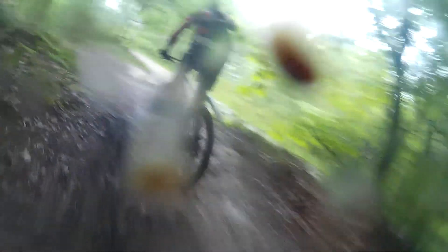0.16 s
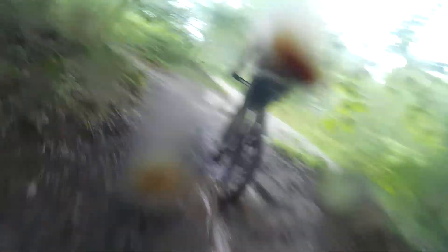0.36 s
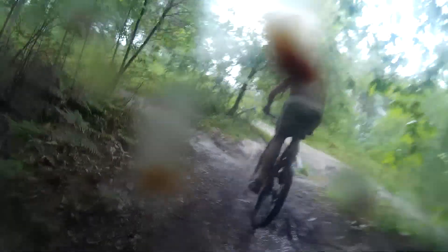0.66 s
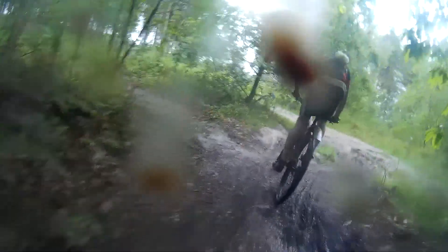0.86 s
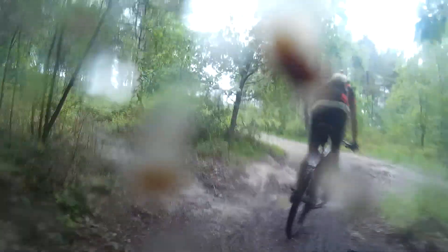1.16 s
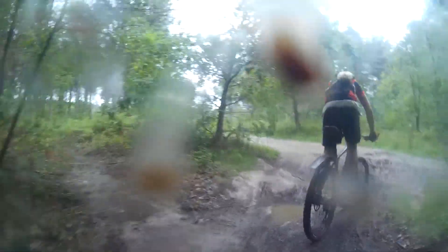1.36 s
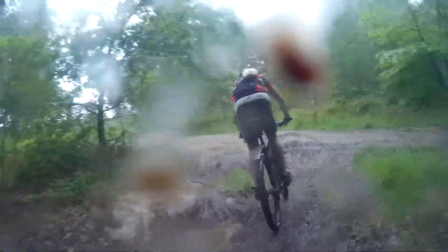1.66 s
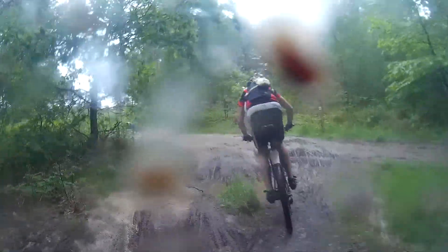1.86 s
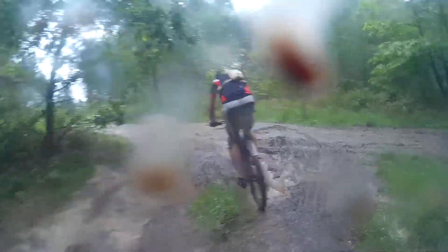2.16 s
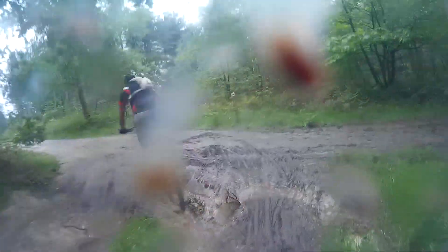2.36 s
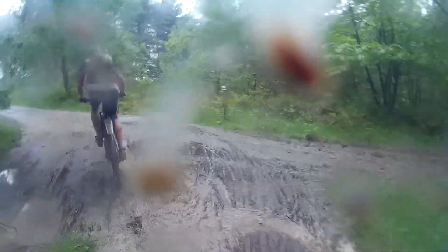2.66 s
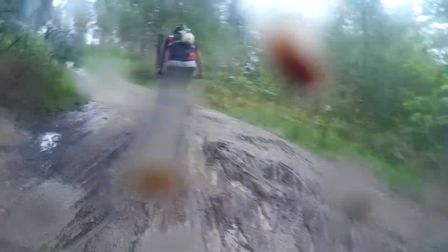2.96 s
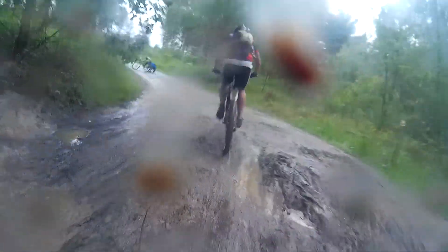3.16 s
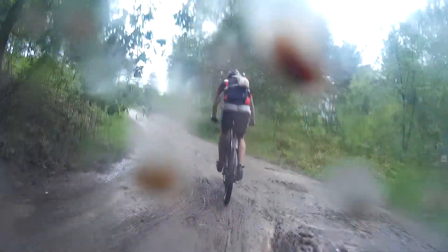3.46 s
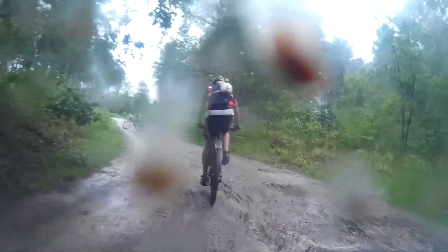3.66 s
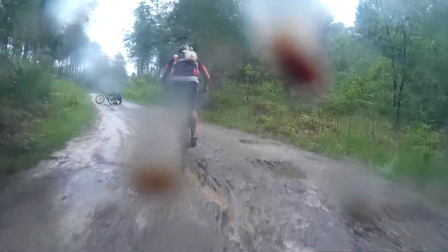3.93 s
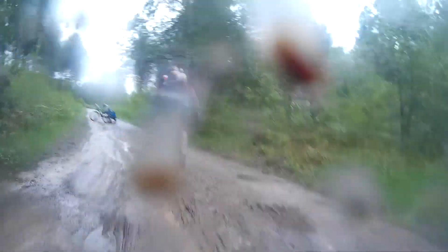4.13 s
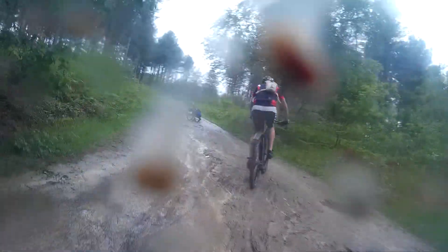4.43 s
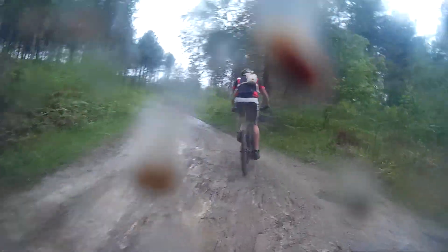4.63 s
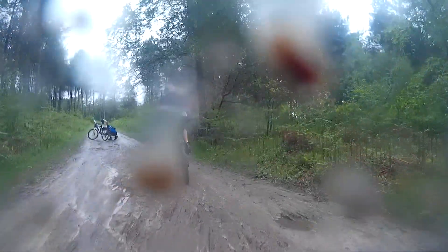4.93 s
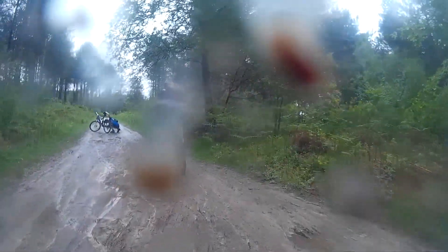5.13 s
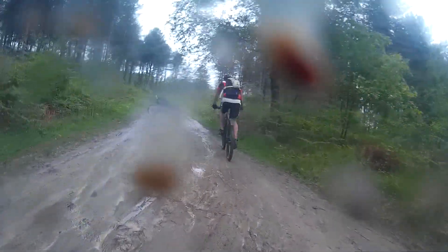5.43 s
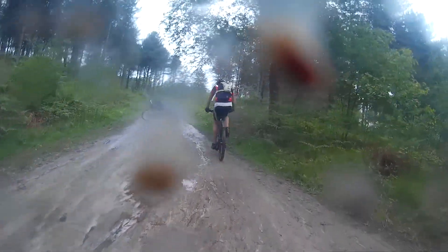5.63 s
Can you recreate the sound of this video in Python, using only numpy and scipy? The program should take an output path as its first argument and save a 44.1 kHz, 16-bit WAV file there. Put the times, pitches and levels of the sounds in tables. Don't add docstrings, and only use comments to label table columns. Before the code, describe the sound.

Close, boxy and muffled sound of a bike on a wet forest trail. Low buffeting and throbbing from the shaking mount, hollow frame rumble and gritty spatter run on, with irregular clacks and thuds. Knocks crowd together just before and at four seconds; after about four and a half the lows sink, leaving patter, faint hiss and a last cluster of hollow chain slaps.

```python
import sys
import numpy as np
from scipy import signal
from scipy.fft import rfft, irfft
from scipy.io import wavfile
from scipy.ndimage import uniform_filter1d, map_coordinates

SR = 44100
rng = np.random.default_rng(int(sys.argv[2]) if len(sys.argv) > 2 else 0)


def voltage_ratio(decibels):
    exponent = np.asarray(decibels, float) / 20
    return 10 ** exponent


def unload_audio(sound):
    columns = np.transpose(np.atleast_2d(sound))
    steps = np.round(np.clip(columns, -1, 1) * 32767)
    wavfile.write(sys.argv[1], SR, steps.astype(np.int16))


N = 255308

# pitch in Hz, level in dB per Hz.
HISS_COLOR = [(3500, -60), (4800, 0), (5500, -2.5), (7500, -2), (9000, -3), (14300, -3.5), (15600, -10),
              (15750, -91)]
HISS_DB = -72
# pitch in Hz, level in dB.
WHINES = [(6320, -94), (9485, -90), (9555, -88)]

# time in seconds, mud thrown in dB, wetness in dB, shaking in dB.
TRAIL = [(0.0, -45, -12, 3.5), (0.11, -54, -9.5, -0.5), (0.42, -37, -18, 5), (0.6, -49, -18.5, -4.5),
         (0.8, -43.5, -16, 4), (1.13, -41.5, -19, 2.5), (1.32, -48, -20.5, -3), (1.51, -42.5, -14, 0.5),
         (1.88, -42, -14, -1), (2.3, -42, -18.5, -0.5), (2.93, -43, -9, -2), (3.2, -47, -15.5, 0.5),
         (3.8, -41.5, -19, 1), (4.3, -46, -16, -2.5), (4.62, -53, -15, -7), (4.78, -43, -17.5, 2.5),
         (5.0, -40, -19.5, 1.5), (5.79, -46, -16, 0.5)]
WIND_DB, WIND_FOLLOWS, FRAME_DB, FRAME_FOLLOWS = -39, 1.1, -45.5, 1
COAST_S, COAST_DB, COAST_EASE_S = 4.446, -8, 0.074

# pitch in Hz, level in dB per Hz.
RUMBLE_COLOR = [(50, -22.5), (85, 1), (140, -6), (221, -1), (258, -13.5), (320, -14.5), (420, -26),
                (700, -120)]
FRAME_COLOR = [(160, -31), (280, -8.5), (339, -7), (404, 3), (452, 2), (523, -8), (594, -13.5), (681, -7),
               (820, -14), (870, -12), (900, -27), (1170, -85.5), (1980, -120)]
SHELL_COLOR = [(510, -25), (860, -7.5), (1000, 1), (1200, -3), (1420, 3), (1640, 1), (1760, 0),
               (1940, -18.5), (2000, -19.5), (2600, -55.5), (4400, -120)]
LID_COLOR = [(1140, -34), (1930, -4.5), (2130, 5), (2520, -3.5), (2630, 1), (2810, 0), (2970, -3),
             (3150, -15), (4100, -47), (6930, -120)]
LATCH_COLOR = [(1140, -49), (1930, -17), (2000, -4), (2360, -0.5), (2680, -1.5), (2910, -7.5),
               (3150, -18.5), (3860, -10.5), (4730, -32.5), (5000, -36.5), (6500, -64), (11000, -120)]
WINDOW_COLOR = [(1850, -46.5), (3150, -16), (3680, 0), (3830, -0.5), (4440, -12.5), (4730, -23.5),
                (5000, -29.5), (6500, -53), (11000, -120)]
LEAK_COLOR = [(1000, -97.5), (3500, -24), (5000, 1.5), (7000, -2.5), (9000, -17.5), (14000, -16.5),
              (15700, -46.5)]

# start in seconds, length in seconds, shell level in dB, window level in dB, treble level in dB.
SCUFFS = [(0.0, 0.25, -50.5, -61, -84), (2.434, 0.067, -43.5, -56, -86.5), (2.89, 0.1, -50, -54, -86),
          (2.65, 0.07, -44, -62, -88), (4.87, 0.12, -44, -64, -88), (0.225, 0.03, -48, -58, -86),
          (0.39, 0.03, -50, -58, -86), (3.191, 0.015, -29, -40.5, -63), (3.424, 0.12, -45, -59, -82),
          (5.142, 0.0092, -46, -44.5, -85), (3.795, 0.049, -41, -51.5, -72),
          (4.007, 0.034, -35.5, -44.5, -58), (4.038, 0.018, -31, -47, -75), (4.173, 0.057, -48, -55.5, -71)]
# start in seconds, pitch in Hz, level in dB, fade by 60 dB in seconds.
PINGS = [(0.0, 289, -23.5, 0.32), (1.91, 708, -28, 0.055), (1.97, 495, -26, 0.089), (2.31, 2110, -43, 0.27),
         (4.36, 2920, -56.5, 0.16), (4.84, 2900, -52, 0.23), (5.155, 2880, -45.5, 0.18),
         (5.22, 2900, -49.5, 0.11), (4.53, 448, -32, 0.11), (4.565, 1636, -26.5, 0.096),
         (4.566, 2860, -47, 0.096), (4.72, 1707, -32, 0.21), (4.72, 2097, -44, 0.13),
         (4.791, 404, -21, 0.12), (3.196, 1060, -28.5, 0.033), (4.83, 683, -32, 0.094),
         (5.0, 810, -33.5, 0.097), (5.08, 824, -23.5, 0.035), (5.34, 1737, -31, 0.09),
         (5.597, 434, -28.5, 0.37)]
# start in seconds, peak in dB.
CRACKS = [
    (3.194, -56),
    (3.936, -52),
    (4.011, -44),
    (4.038, -36),
    (4.045, -48),
    (4.331, -62),
]
# start in seconds, peak in dB, pitch in Hz.
SHELL_SNAPS = [(0.152, -22, 1340), (0.419, -30, 1450), (0.45, -26, 1550), (0.489, -30, 1420),
               (0.504, -27, 1470), (0.802, -30, 1490), (0.83, -17, 1590), (0.868, -25, 958),
               (1.016, -28, 1700), (1.038, -32, 1090), (1.049, -29, 1120), (1.078, -27, 1060),
               (1.253, -30, 1500), (1.271, -27, 980), (1.354, -34, 1530), (1.495, -29, 1050),
               (1.909, -28, 1580), (1.957, -31, 1460), (1.994, -28, 1440), (2.142, -28, 1410),
               (2.31, -29, 1410), (2.328, -27, 1380), (2.444, -27, 1750), (3.054, -27, 1410),
               (3.111, -26, 991), (3.195, -18, 1430), (3.365, -30, 1400), (3.399, -34, 1290),
               (3.63, -32, 1330), (3.642, -26, 1550), (3.687, -29, 1430), (3.722, -22, 993),
               (3.752, -23, 851), (3.752, -14, 1650), (3.77, -18, 1650), (3.807, -24, 1500),
               (3.968, -31, 1030), (4.013, -23, 1440), (4.043, -21, 1510), (4.235, -33, 1460),
               (4.33, -32, 1420), (4.391, -34, 1510), (4.565, -27, 1640), (4.716, -31, 1700),
               (4.777, -29, 1520), (4.792, -24, 999), (4.821, -29, 1050), (5.004, -25, 1360),
               (5.082, -27, 980), (5.149, -29, 1670), (5.154, -26, 1340), (5.339, -29, 1290),
               (5.413, -30, 1430), (5.428, -28, 1020), (5.48, -32, 1430), (5.523, -14, 1680),
               (5.564, -18, 1010), (5.593, -14, 1100), (5.637, -23, 1080), (5.683, -36, 1390)]
# start in seconds, peak in dB, pitch in Hz.
GRIT_SPITS = [(0.1516, -40, 3830), (0.2239, -43, 2710), (0.2389, -43, 2120), (0.3985, -39, 2770),
              (0.7672, -44, 3680), (0.828, -32, 2630), (0.8934, -45, 2110), (0.9038, -42, 2070),
              (1.072, -43, 2240), (1.2705, -36, 2660), (1.8462, -39, 3790), (2.1365, -45, 2360),
              (2.1934, -40, 2310), (2.3096, -41, 2100), (2.9527, -36, 2710), (3.1941, -32, 3680),
              (3.3643, -44, 2240), (3.6401, -37, 2320), (3.7199, -39, 2630), (3.7499, -31, 2440),
              (3.7713, -33, 2330), (3.8038, -30, 2290), (3.8726, -46, 2590), (4.0108, -36, 3870),
              (4.0427, -30, 2130), (4.1884, -43, 3820), (4.5665, -41, 2880), (4.7177, -45, 2100),
              (4.7895, -32, 2390), (4.9023, -43, 2260), (4.9995, -41, 2210), (5.0399, -43, 2170),
              (5.1437, -29, 2700), (5.4246, -41, 2350), (5.5223, -33, 2610), (5.5623, -37, 2390),
              (5.5902, -28, 2350), (5.6211, -41, 2090), (5.6336, -39, 2110), (5.6845, -46, 2640)]
# start in seconds, peak in dB, pitch in Hz.
TUBE_JOLTS = [(0.579, -30, 125), (0.742, -27, 190), (0.77, -27, 150), (0.81, -26, 170), (0.86, -23, 135),
              (0.885, -24, 150), (0.938, -26, 130), (1.008, -27, 175), (1.045, -27, 487), (1.1, -22, 430),
              (1.118, -24, 215), (1.384, -33, 188), (1.494, -23, 218), (1.53, -27, 190), (1.678, -30, 223),
              (1.757, -29, 125), (1.888, -30, 484), (1.912, -29, 377), (2.797, -29, 200), (2.92, -27, 110),
              (3.13, -26, 130), (3.178, -21, 105), (3.188, -25, 410), (3.206, -19, 160), (3.303, -24, 430),
              (3.465, -25, 120), (3.57, -27, 430), (3.716, -30, 191), (3.905, -28, 480), (4.01, -27, 460),
              (4.234, -29, 125), (4.329, -32, 215), (4.383, -33, 220), (4.43, -34, 140), (4.52, -35, 150),
              (4.6, -35, 190), (4.9, -33, 330), (4.959, -34, 180), (5.421, -35, 90)]

# start in seconds, peak in dB, bright part in dB, dull part in dB.
CHAIN_SLAPS = [(0.151, -20, -22, -15), (0.451, -25.5, -21.5, 1), (0.504, -21.5, -21, -23),
               (0.829, -11.5, -21, -6.5), (0.868, -23, -22, -20), (1.077, -25, -20.5, 5),
               (1.271, -20.5, -17, -1), (1.911, -29.5, -27, 9.5), (1.995, -26, -19.5, 4),
               (2.328, -23.5, -25, -17), (2.444, -22, -21, -8), (3.056, -22, -20, -7.5),
               (3.111, -23.5, -21, 7), (3.194, -12, -30, -7.5), (3.365, -23, -23.5, -6),
               (3.641, -19.5, -19.5, -18), (3.721, -19.5, -22, -15), (3.75, -11.5, -22.5, -21),
               (3.77, -12, -23, -7.5), (3.806, -20, -16, -16), (4.042, -19, -12, -4), (4.052, -24, -13, -8),
               (4.563, -24.5, -15.5, -25), (4.789, -21.5, -12.5, 10), (4.82, -24, -30, 8.5),
               (5.001, -22, -21, -8), (5.145, -20.5, -13, 0), (5.523, -9.5, -22, -14),
               (5.564, -19, -17, -6), (5.591, -11.5, -17, -22), (5.636, -21, -20, 4.5)]
# start in seconds, peak in dB.
MORE_SLAPS = [(0.265, -31), (0.419, -23), (0.489, -24.5), (0.753, -32), (0.803, -29), (1.015, -27),
              (1.036, -33), (1.354, -30), (1.411, -31), (1.495, -26.5), (1.547, -26.5), (2.141, -35),
              (2.205, -21.5), (2.308, -24.5), (2.425, -28.5), (2.693, -27.5), (3.042, -27), (3.666, -30),
              (3.685, -25), (4.013, -24), (4.185, -26), (4.234, -30), (4.33, -27.5), (4.389, -30),
              (4.716, -27.5), (4.777, -25), (5.082, -32), (5.413, -33), (5.429, -23.5), (5.752, -31)]
TICK_BRIGHT_DB, TICK_DULL_DB = -21, -8
# start in seconds, peak in dB.
BUMPS = [(0.355, -25.5), (0.53, -17.5), (0.743, -33), (0.787, -24), (1.102, -13), (1.498, -22.5),
         (1.814, -27), (1.963, -34.5), (2.272, -25.5), (2.336, -23), (2.446, -27.5), (2.56, -23.5),
         (2.885, -27), (2.974, -21.5), (3.051, -23.5), (3.108, -25.5), (3.202, -14), (3.304, -17),
         (3.338, -29), (3.422, -23.5), (3.568, -24), (3.801, -18), (3.92, -21), (3.964, -16),
         (4.003, -22.5), (4.0366, -6.5), (4.101, -14.5), (4.196, -16), (4.793, -25), (5.521, -30)]
PUSH_S = 0.00312

# start in seconds, length in seconds, peak in dB, share of the length spent building up (0 to 1).
SWINGS = [(-0.04, 0.22, -21.5, 0.48), (0.125, 0.068, -20.5, 0.75), (0.201, 0.39, -22.5, 0.43),
          (0.443, 0.31, -17.5, 0.34), (0.775, 0.58, -24, 0.2), (1.059, 0.24, -14.5, 0.63),
          (1.32, 0.17, -22.5, 0.56), (1.475, 0.16, -14.5, 0.53), (1.636, 0.25, -24.5, 0.59),
          (1.87, 0.25, -20, 0.62), (2.118, 0.12, -23, 0.71), (2.262, 0.17, -24, 0.59),
          (2.424, 0.11, -16.5, 0.39), (2.516, 0.21, -21.5, 0.29), (2.695, 0.3, -20.5, 0.34),
          (2.945, 0.24, -17.5, 0.74), (3.173, 0.16, -16, 0.3), (3.318, 0.34, -17.5, 0.37),
          (3.664, 0.1, -33, 0.35), (3.785, 0.12, -22, 0.35), (3.949, 0.065, -24, 0.62),
          (4.036, 0.062, -12, 0.35), (4.139, 0.17, -21.5, 0.47), (4.286, 0.096, -27.5, 0.3),
          (4.4, 0.07, -37, 0.7), (4.483, 0.11, -29.5, 0.61), (4.564, 0.24, -30.5, 0.5),
          (4.796, 0.26, -29, 0.32), (5.007, 0.4, -34, 0.57), (5.463, 0.37, -32, 0.22)]
SWING_PEAKY, SWING_REST_DB = 1.1, -33
# time in seconds, pitch in Hz.
STIFFNESS = [
    (0, 53.38),
    (1.2, 48.95),
    (1.7, 51.68),
    (2.3, 47.44),
    (2.7, 49.06),
    (3.1, 50.3),
    (4.4, 48.36),
    (5.3, 52.6),
    (5.79, 48),
]


def unit(x):
    return x / np.sqrt(np.mean(x ** 2) + 1e-20)


def curves(rows):
    s, *cols = np.transpose(rows)
    return [np.interp(np.arange(N) / SR, s, c) for c in cols]


def wobble(rate):
    knots = rng.standard_normal(int(N * rate / SR) + 4)
    return map_coordinates(knots, [np.arange(N) * rate / SR])


def response(points):
    size = 8192
    f, db = np.transpose(points)
    bins = np.fft.rfftfreq(size, 1 / SR)
    gain_db = np.interp(np.log(bins + 1), np.log(f + 1), db)
    cepstrum = irfft(np.log(voltage_ratio(gain_db) + 1e-6), size)
    cepstrum[1:size // 2] *= 2
    cepstrum[size // 2 + 1:] = 0
    h = irfft(np.exp(rfft(cepstrum)), size)[:size // 2]
    return h / np.linalg.norm(h)


def through(x, points):
    return signal.fftconvolve(x, response(points))[:N]


def struck(x, hz, width_hz):
    t = np.arange(SR // 8) / SR
    ring = np.exp(-np.pi * width_hz * t) * np.sin(2 * np.pi * hz * t)
    return unit(signal.fftconvolve(x, ring)[:N])


def patter(per_second, spread_db, share, life):
    draw = rng.random((N, 2))
    sizes = voltage_ratio(-spread_db * np.log(draw[:, 1] + 0.26))
    hits = (draw[:, 0] < per_second / SR) * sizes
    t = np.arange(SR // 50) / SR
    grains = signal.fftconvolve(hits, voltage_ratio(-60 * t / life))[:N] * rng.standard_normal(N)
    share = np.clip(share, 0, 1)
    return np.sqrt(share) * unit(grains) + np.sqrt(1 - share) * rng.standard_normal(N)


def drops(per_second, hz, spread, cycles):
    count = int(per_second * N / SR)
    draw, t = rng.random((count, 3)), np.arange(SR // 40) / SR
    pitch = hz * np.exp(spread * (2 * draw[:, 1:2] - 1))
    u = t * pitch / cycles
    sizes = voltage_ratio(-4 * np.log(draw[:, 2:] + 0.05))
    rings = sizes * u * np.exp(-4 * u) * np.sin(2 * np.pi * pitch * t)
    place = (draw[:, :1] * N).astype(int) + np.arange(len(t))
    return unit(np.bincount(place.ravel(), rings.ravel())[:N])


def calm_db():
    return COAST_DB / 2 * (1 + np.tanh((np.arange(N) / SR - COAST_S) / COAST_EASE_S))


def microphone_hiss():
    t = np.arange(N) / SR
    hiss = voltage_ratio(HISS_DB) * unit(through(rng.standard_normal(N), HISS_COLOR))
    for hz, db in WHINES:
        hiss += voltage_ratio(db + 1.5 * wobble(5)) * np.sin(2 * np.pi * hz * t)
    return hiss


def wind(knocks, shake_db):
    level_db = WIND_DB + calm_db() + WIND_FOLLOWS * shake_db + 2.5 * wobble(22)
    return voltage_ratio(level_db) * unit(through(knocks, RUMBLE_COLOR))


def frame_rumble(knocks, mud, shake_db, clumps):
    level_db = FRAME_DB + FRAME_FOLLOWS * shake_db + 2.5 * clumps + 2.1 * wobble(18)
    return voltage_ratio(level_db) * unit(through(0.78 * knocks + 0.63 * mud, FRAME_COLOR))


def mud_on_shell(mud, mud_db, clumps):
    blobs = drops(per_second=220, hz=1361, spread=.35, cycles=16.2)
    level_db = mud_db - 0.5 + 2.0 * clumps + 0.83 * wobble(40)
    return voltage_ratio(level_db) * (0.74 * unit(through(mud, SHELL_COLOR)) + 0.53 * unit(through(blobs, SHELL_COLOR)))


def spray_on_lid(mud, fizz, knocks, spray_db, clumps):
    panels = 0.5 * struck(mud, hz=2870, width_hz=45) + 0.18 * struck(knocks, hz=2120, width_hz=35)
    level_db = spray_db - 1.5 + 1.4 * clumps + 0.98 * wobble(14)
    return voltage_ratio(level_db) * (unit(through(.6 * mud + .8 * fizz, LID_COLOR)) + panels)


def spray_on_window(mud, fizz, spray_db, clumps):
    tone = 0.31 * struck(fizz, hz=3813, width_hz=38)
    level_db = spray_db - 4.0 + 1.5 * clumps + 1.5 * wobble(9.1)
    return voltage_ratio(level_db) * (unit(through(0.34 * mud + .9 * fizz, WINDOW_COLOR)) + tone)


def ride():
    mud_db, wet_db, shake_db = curves(TRAIL)
    spray_db = mud_db + wet_db
    clumps = wobble(14)
    mud = patter(per_second=150, spread_db=4, share=.5, life=.01)
    fizz = patter(per_second=500, spread_db=9.0, share=0.52, life=0.015)
    knocks = patter(per_second=90, spread_db=2.5, share=0.39, life=0.014)
    low = wind(knocks, shake_db) + frame_rumble(knocks, mud, shake_db, clumps)
    lid = spray_on_lid(mud, fizz, knocks, spray_db, clumps)
    window = spray_on_window(mud, fizz, spray_db, clumps)
    return low + mud_on_shell(mud, mud_db, clumps) + lid + window


def scuffs():
    parts, t = np.zeros((3, N)), np.arange(N) / SR
    grit = patter(per_second=350, spread_db=3.0, share=0.49, life=0.0041)
    for s, length, *levels_db in SCUFFS:
        u = np.clip((t - s) / length, 0, 1)
        parts += voltage_ratio(levels_db)[:, None] * np.sin(np.pi * u ** .6) * grit
    regions = (SHELL_COLOR, WINDOW_COLOR, LEAK_COLOR)
    return sum(through(part, region) for part, region in zip(parts, regions))


def pings():
    out, t = np.zeros(N + SR), np.arange(SR // 3) / SR
    flutter, slip = voltage_ratio(3 * wobble(90)), np.pad(.8 * wobble(70), (0, SR))
    for s, hz, db, t60 in PINGS:
        at = round(s * SR)
        size = voltage_ratio(db - 1.2 - 60 * t / t60) * (1 - np.exp(-t / 0.0037))
        out[at:][:len(t)] += size * np.sin(2 * np.pi * hz * t + slip[at:][:len(t)])
    return out[:N] * flutter


def cracks():
    out, t = np.zeros(N + SR), np.arange(SR // 50) / SR
    for s, db in CRACKS:
        out[round(s * SR):][:len(t)] += voltage_ratio(db - 5.5 - 60 * t / 0.0058) * rng.standard_normal(len(t))
    return through(out[:N], LEAK_COLOR)


def flecks(rows, cycles, gain_db, top_hz):
    out, t = np.zeros(N + SR), np.arange(SR // 12) / SR
    for (s, db, hz), (turn, glide) in zip(rows, rng.random((len(rows), 2))):
        u = t * hz / cycles
        ring = np.sin(2 * np.pi * (hz * t + turn + .3 * (glide - .5) * u ** 2))
        out[round(s * SR):][:len(t)] += voltage_ratio(db + gain_db) * (u * np.exp(1 - u)) ** 2 * ring
    return signal.sosfilt(signal.butter(6, top_hz, fs=SR, output="sos"), out[:N])


def rattles():
    parts, t = np.zeros((3, N + SR)), np.arange(SR // 16) / SR
    ticks = [(*tick, TICK_BRIGHT_DB, TICK_DULL_DB) for tick in MORE_SLAPS]
    for s, db, bright_db, dull_db in list(CHAIN_SLAPS) + ticks:
        soft = 1 + 0.009 * max(-22 - db, 0)
        shape = voltage_ratio(-60 * t / (0.02 * soft)) * (1 - np.exp(-t / (0.0039 * soft)))
        burst = shape * rng.standard_normal(len(t))
        burst /= np.sqrt(np.sum(burst ** 2) / np.sum(shape ** 2))
        start = round((s - .0015) * SR)
        levels_db = db + np.array([[1.8], [bright_db + 7.5], [dull_db + 3.5]])
        parts[:, start:][:, :len(t)] += voltage_ratio(levels_db) * burst
    regions = (SHELL_COLOR, LATCH_COLOR, FRAME_COLOR)
    return sum(through(part[:N], region) for part, region in zip(parts, regions))


def bumps():
    out, t = np.zeros(N + SR), np.arange(SR // 10) / SR
    u = t / PUSH_S
    pull = np.exp(-((u - .8) / .35) ** 2)
    push = np.exp(-((u - 1.55) / .4) ** 2) + .45 * np.exp(-((u - 2.6) / .8) ** 2)
    late = np.maximum(t - PUSH_S, 0)
    for s, db in BUMPS:
        thud_hz = 390 * np.exp(.1 * rng.standard_normal())
        thud = voltage_ratio(-10 - 60 * late / 0.045) * np.sin(2 * np.pi * thud_hz * late)
        out[round(s * SR):][:len(t)] += voltage_ratio(db - 0.3) * (0.81 * push - pull + thud)
    return out[:N]


def swings():
    t, power = np.arange(N) / SR, voltage_ratio(SWING_REST_DB + 1.8 * calm_db()) ** 2
    for s, length, db, build in SWINGS:
        bend = np.log(.5) / np.log(np.clip(build, .1, .9))
        u = np.clip((t - s) / length, 0, 1) ** bend
        power += (voltage_ratio(db) * np.abs(np.sin(np.pi * u)) ** SWING_PEAKY) ** 2
    return np.sqrt(power)


def mount():
    hz = curves(STIFFNESS)[0] + 1.6 * wobble(9)
    phase = 2 * np.pi * np.cumsum(hz) / SR
    slop_color = [(8, -30.5), (22, 2), (38, 10.5), (64, 8), (80, -1.5), (95, -38), (200, -120)]  # Hz, dB
    slop = unit(through(rng.standard_normal(N), slop_color))
    swing = np.sin(phase) + voltage_ratio(-35.0) * np.sin(2 * phase)
    size = swings()
    return np.sqrt(2) * size * swing + voltage_ratio(-15) * size ** 0.61 * slop


def scene():
    steady = ride() + scuffs() + pings() + cracks() + rattles() + bumps() + mount()
    snaps = flecks(SHELL_SNAPS, cycles=2.7, gain_db=-4, top_hz=1950)
    spits = flecks(GRIT_SPITS, cycles=6, gain_db=-6.5, top_hz=4300)
    jolts = flecks(TUBE_JOLTS, cycles=1.1, gain_db=-5, top_hz=520)
    return (steady + snaps + spits + jolts)[None]


def band_limit(x):
    return signal.sosfilt(signal.butter(12, 15970, fs=SR, output="sos"), x)


def record(dry):
    hiss = microphone_hiss()
    loud_db = 10 * np.log10(np.abs(uniform_filter1d(dry[0] ** 2, size=2600)) + 1e-12)
    late_db = uniform_filter1d(np.maximum(loud_db + 21, 0), size=5000, origin=2000)
    duck = voltage_ratio(-.75 * late_db)
    blocked = signal.sosfilt(signal.butter(1, 8, "high", fs=SR, output="sos"), dry)
    return band_limit(blocked + duck * hiss)


dry = scene()
out = record(dry)
unload_audio(out)
```